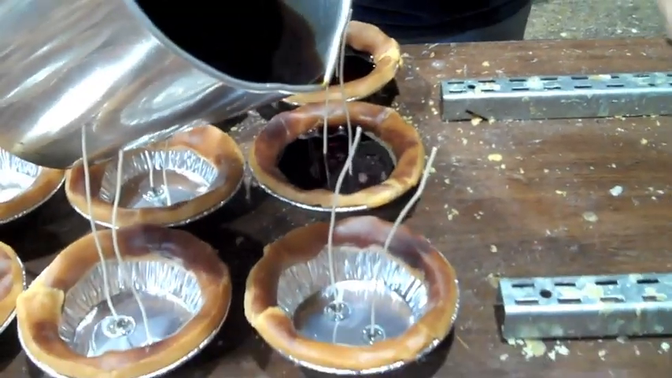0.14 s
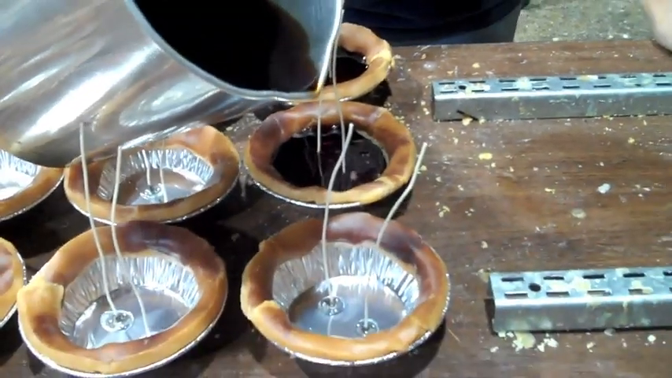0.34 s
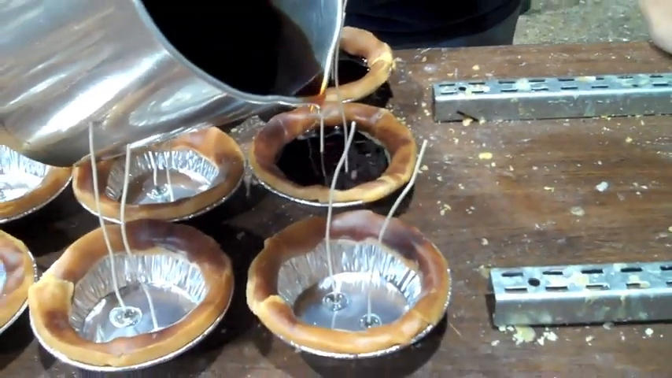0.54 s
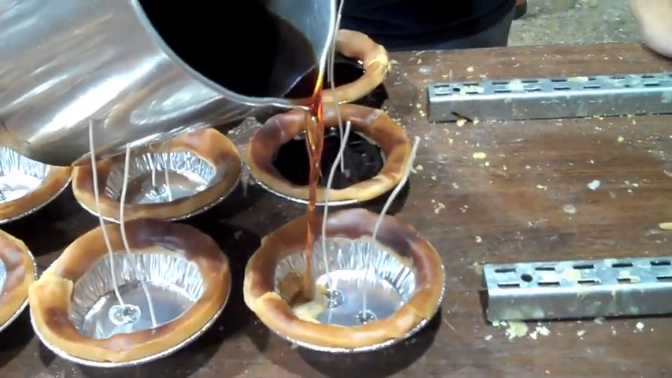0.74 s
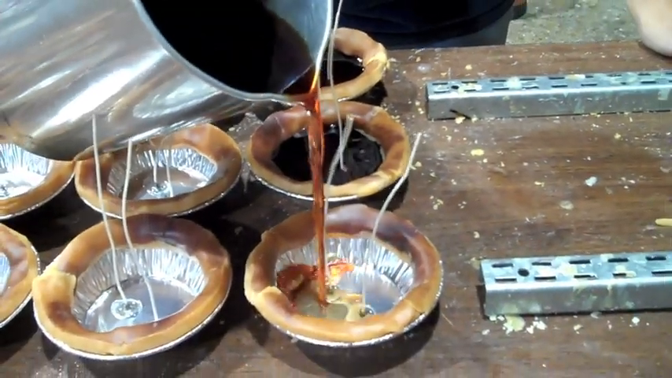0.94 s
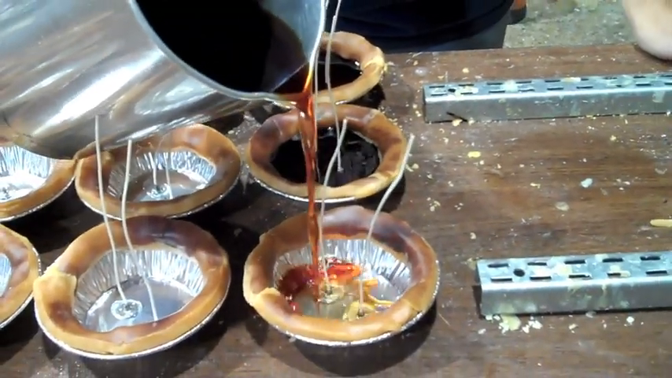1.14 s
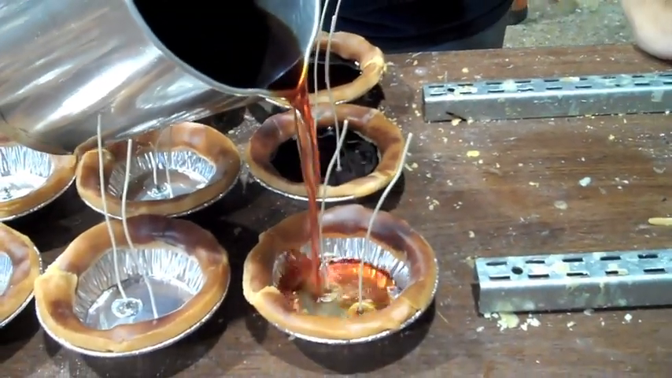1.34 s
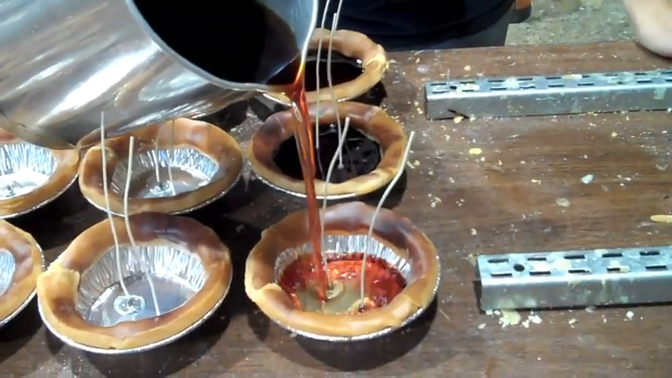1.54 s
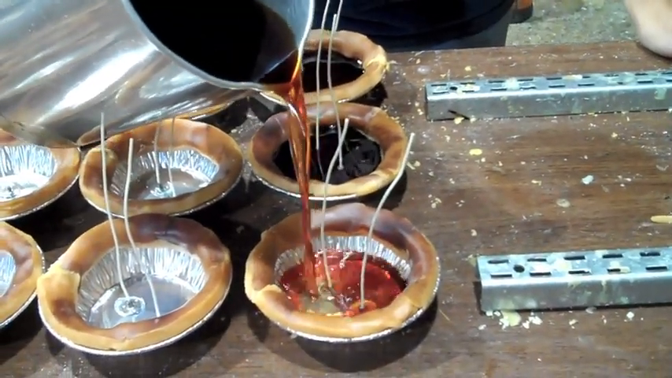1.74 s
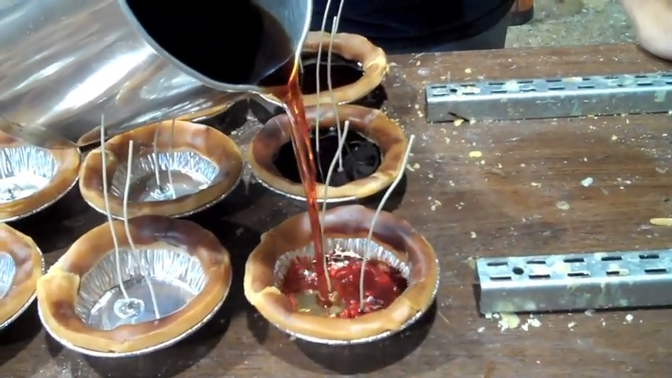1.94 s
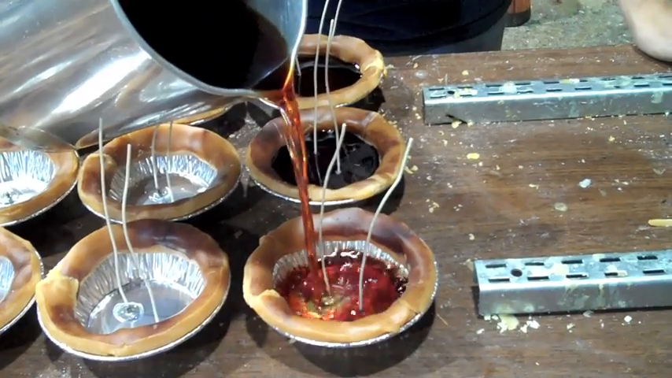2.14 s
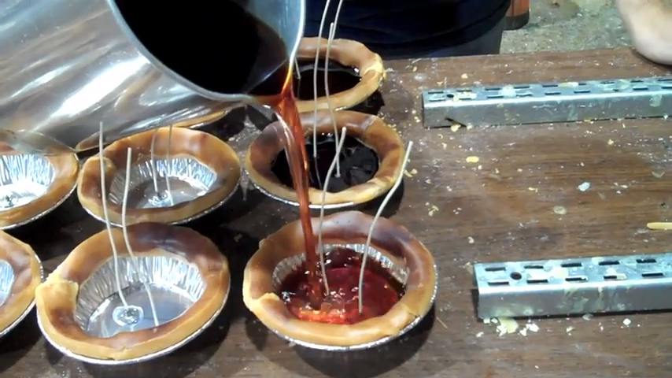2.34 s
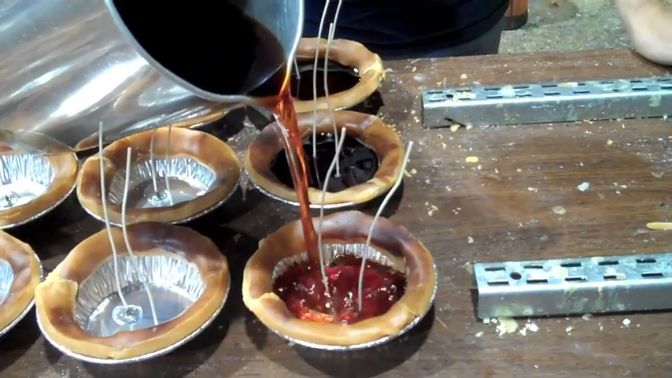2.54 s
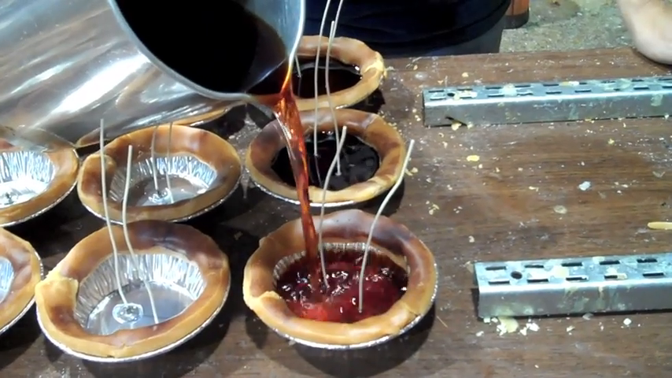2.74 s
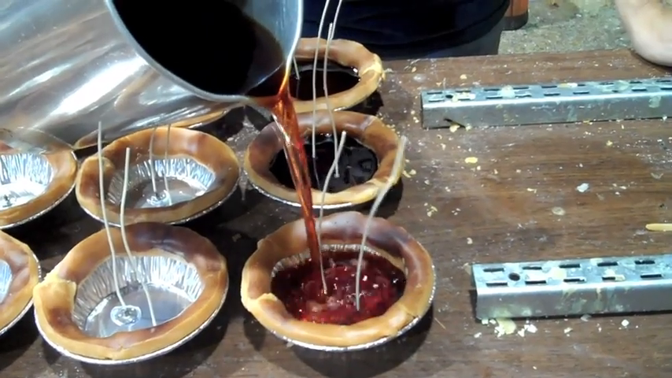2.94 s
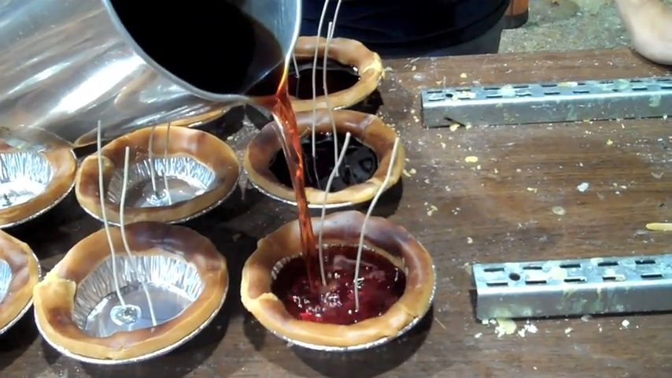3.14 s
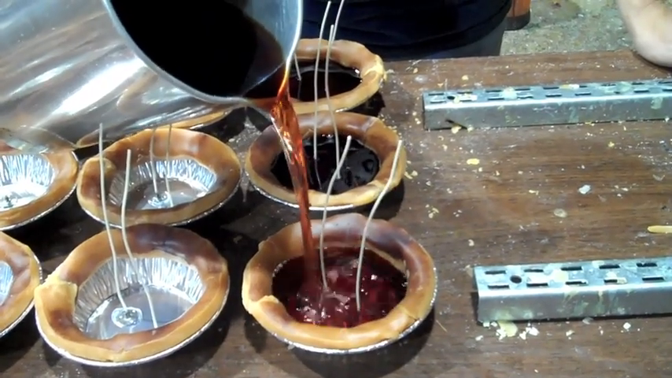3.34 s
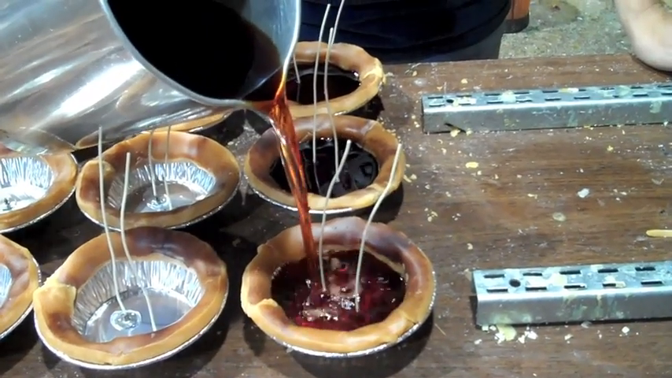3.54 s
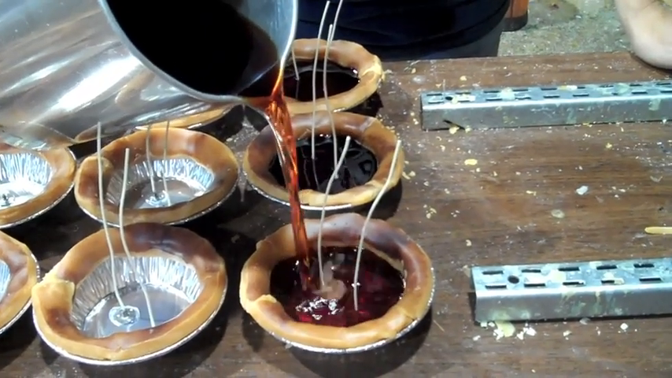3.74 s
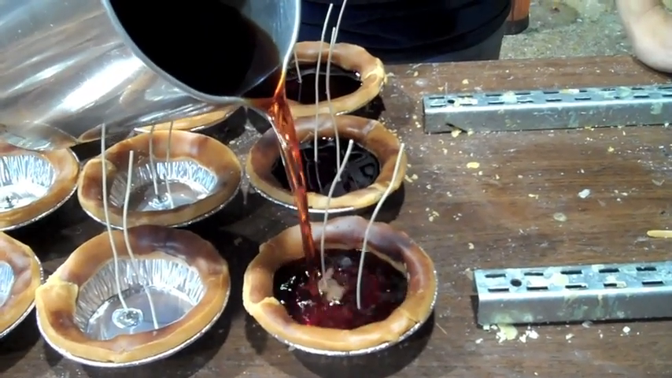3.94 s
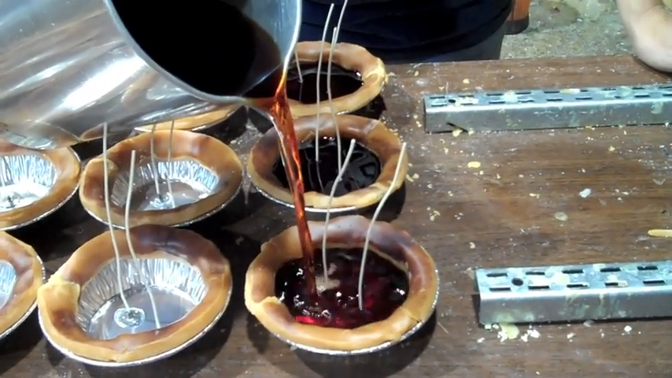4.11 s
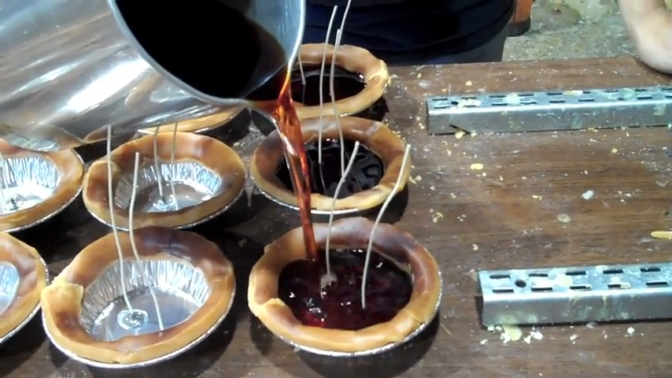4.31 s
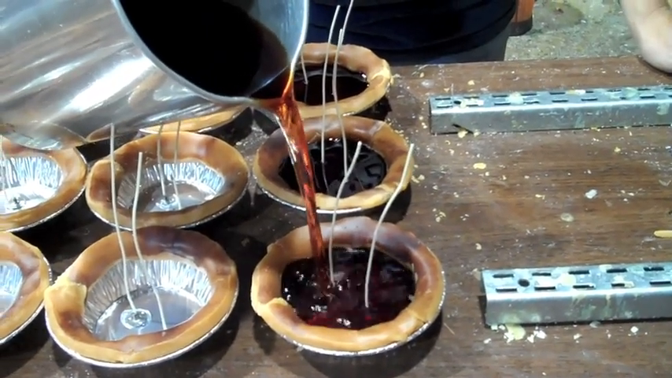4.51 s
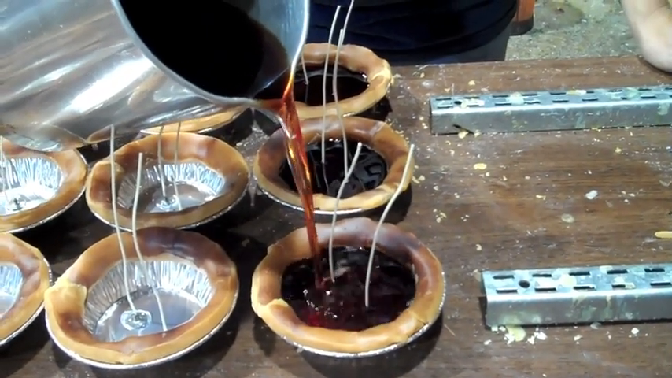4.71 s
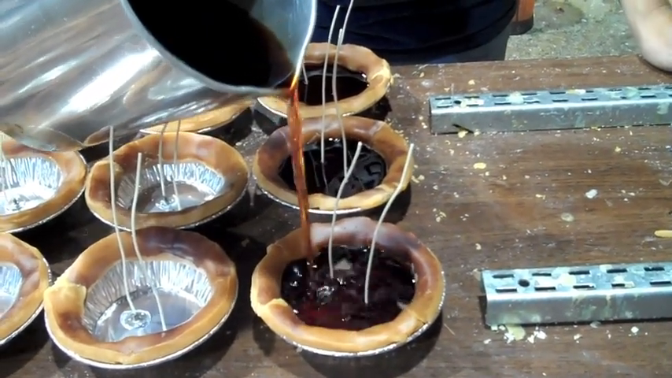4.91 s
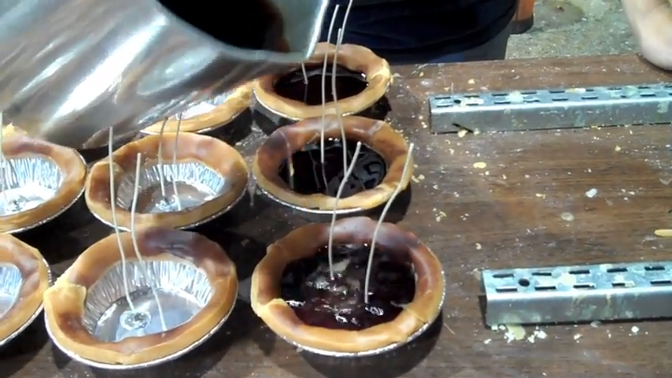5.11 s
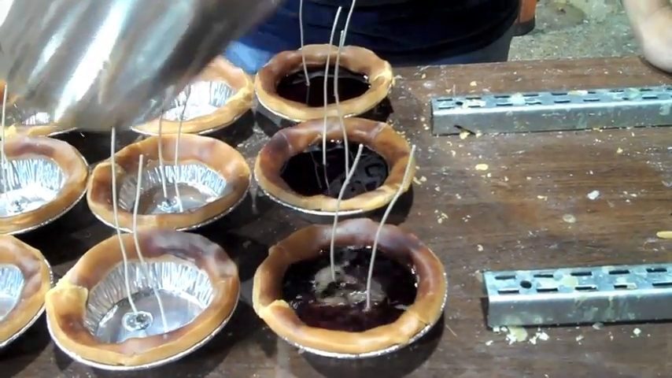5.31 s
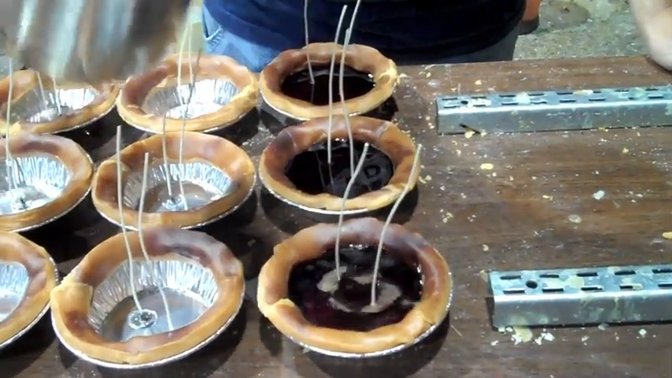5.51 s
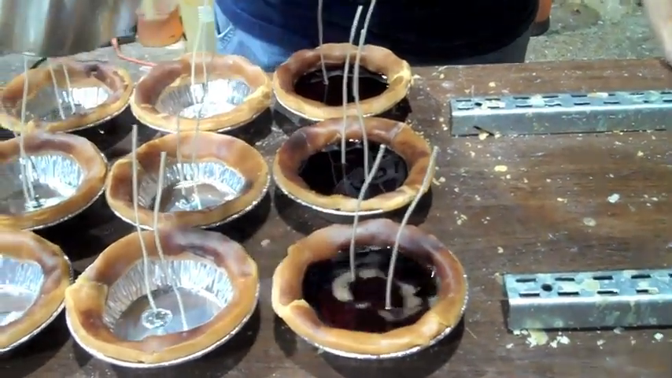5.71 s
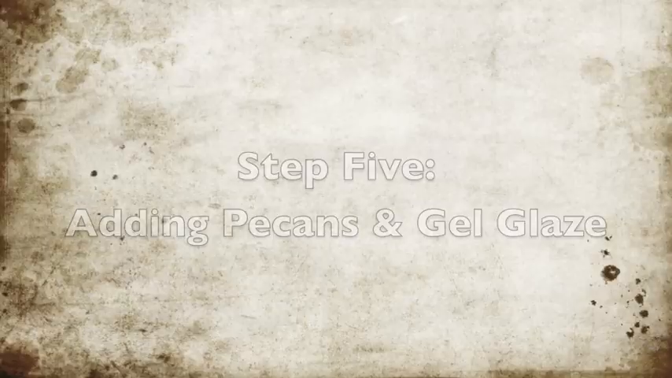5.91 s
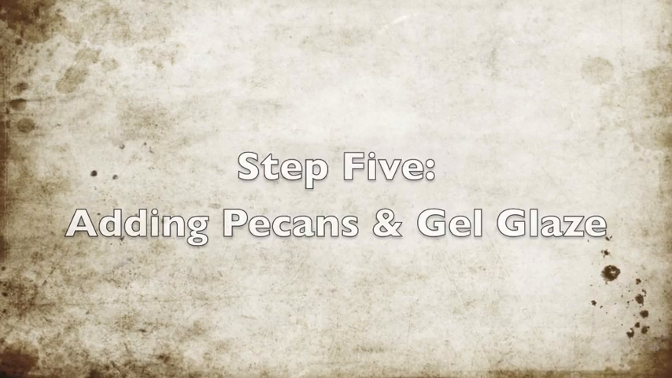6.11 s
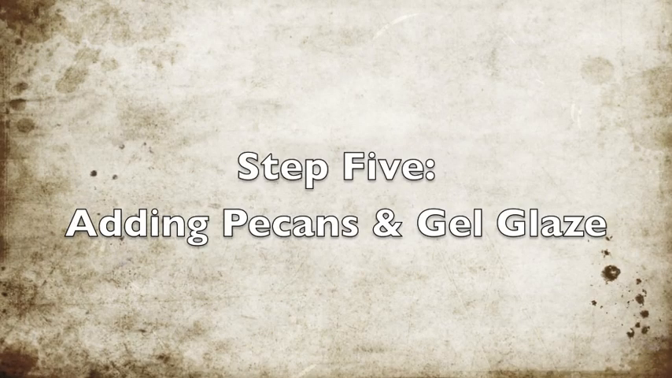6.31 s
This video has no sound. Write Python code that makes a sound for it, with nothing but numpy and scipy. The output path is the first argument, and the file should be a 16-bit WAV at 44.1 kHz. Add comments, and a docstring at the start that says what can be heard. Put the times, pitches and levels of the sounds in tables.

```python
"""At a table, a camera's two microphones stand close to a small foil tin as liquid wax runs into it.
The first drops patter on bare foil; then the stream spatters as damped sines and a wash of noise.
Bubbles caught in the rising pool snap and ring as rising tones; tin and surroundings echo the pour.
A fan-like machine nearby hums in wandering sines and shaped noise, with a high hiss and a thin whine.
An insect rasps in narrow noise every two seconds, and all of it fades out quickly."""
import sys
import numpy as np
from scipy import signal
from scipy.fft import rfft, irfft, next_fast_len
from scipy.io import wavfile
from scipy.ndimage import map_coordinates

SR = 44100
rng = np.random.default_rng(int(sys.argv[2]) if len(sys.argv) > 2 else 0)


def unload_audio(sound):
    """Save the sound as a 16-bit wav file, at the path given as the first command line argument."""
    columns = np.transpose(np.atleast_2d(sound))
    # keep every value between -1 and 1, then stretch to whole-number steps
    steps = np.round(np.clip(columns, -1, 1) * 32767)
    wavfile.write(sys.argv[1], SR, steps.astype(np.int16))


N = 280343

# strength of the main stream, which thins to almost nothing and picks up again,
# loud on bare foil and softer as the pool deepens: (time [s], level [dB])
STREAM_FLOW = [(1.239, -65.5), (1.35, -49), (1.46, -41), (1.75, -43), (1.92, -48.5), (2.0, -60.5),
               (2.21, -65), (2.28, -45.5), (2.36, -49), (2.5, -43.5), (2.78, -45), (2.89, -56.5),
               (2.97, -46), (3.14, -53.5), (3.7, -52), (3.84, -55.5), (5.1, -56.5), (5.301, -58)]
# lean of the liquid between the microphones: (frequency [Hz], left-right difference [dB])
LIQUID_LEAN = [(2400, 0), (4400, -1.5), (6000, -4), (7600, 17.5), (12000, 13.5)]

TOP_HZ = 14500  # upper band limit of the camera
SILENT_DB = -120


def amp(db):
    """Amplitude factor of a level in dB."""
    return 10 ** (np.asarray(db) / 20)


def unit(x):
    """Scale x to rms 1."""
    return x / np.sqrt(np.mean(x ** 2) + 1e-20)


def along(points, hz):
    """Read (frequency [Hz], value) points on a log frequency axis."""
    f, v = np.transpose(points)
    return np.interp(np.log(hz + 1), np.log(f + 1), v)


def clock():
    """Time of every sample in seconds."""
    return np.arange(N) / SR


def lean(db):
    """Left and right gains of mean power 1 for a left-right difference in dB."""
    g = amp(np.array([db, -db]) / 2)
    return g / np.sqrt(np.mean(g ** 2, axis=0))


def wobble(rate):
    """A smooth random curve with rate knots a second."""
    knots = rng.standard_normal(int(N * rate / SR) + 4)
    return map_coordinates(knots, [clock() * rate])


def filtered(x, response):
    """Multiply the spectrum of x by a response of frequency."""
    n = x.shape[-1]
    m = next_fast_len(n + 2048)  # zeros at the end keep the filter from wrapping round
    spectrum = rfft(x, m) * response(np.fft.rfftfreq(m, 1 / SR))
    return irfft(spectrum, m)[..., :n]


def add(track, s, sound):
    """Mix a short stereo sound in at time s."""
    part = track[:, max(round(s * SR), 0):][:, :sound.shape[1]]
    part += sound[:, :part.shape[1]]


def at_level(sound, db):
    """Give a short stereo sound the energy of 10 ms at this level."""
    return sound * amp(db) * np.sqrt(2 * SR / 100 / (np.sum(sound ** 2) + 1e-20))


def rush(spectrum):
    """Stereo noise of rms 1: mid and side shares make it alike in the bass, unrelated in the treble."""
    # likeness of the two channels: (frequency [Hz], coherence [0-1])
    likeness = [(60, 0.73), (130, 0.98), (290, 0.92), (640, 0.89), (1410, .7), (3100, 0.25), (6800, 0.027)]

    def mid_side_gains(hz):
        turn = np.arccos(np.clip(along(likeness, hz), -1, 1)) / 2
        return amp(along(spectrum, hz)) * [np.cos(turn), np.sin(turn)]

    mid, side = filtered(rng.standard_normal((2, N)), mid_side_gains)
    return unit(np.array([mid + side, mid - side]))


def tones(lines, drift_hz, waver_db):
    """Sines that wander in level, and in phase by one radian per drift_hz of their pitch."""
    total = 0
    for hz, db in lines:
        level = np.sqrt(2) * amp(db + waver_db * wobble(3.8))
        phase = 2 * np.pi * hz * clock() + hz / drift_hz * wobble(6)
        total = total + level * np.sin(phase)
    return total


def background(throb_hz=28.4, beat_s=2.66):
    """The nearby machine's hum, slow beat and rush of air, with a high hiss and a thin whine."""
    # moving air of the machine: (frequency [Hz], relative density [dB per Hz])
    air_colour = [(20, -20.5), (42, -8.5), (60, -10), (85, -6.5), (110, 0), (150, 1.5), (215, -7.5),
                  (295, -12.5), (430, -8), (770, -12), (900, -15), (1600, -19), (3300, -22.5),
                  (9000, -42.5)]
    # steady hiss: (frequency [Hz], relative density [dB per Hz])
    hiss_colour = [(1000, -32.5), (3300, -4), (5000, -1.5), (6200, 3.5), (7100, 4), (8000, -2.5),
                   (9200, -12), (11500, -16.5), (14300, -19)]
    # lean of the hiss: (frequency [Hz], left-right difference [dB])
    hiss_sides = [(2400, 1), (4400, -1), (6200, -4), (8000, 13.5), (12000, 1)]
    # thin whine: (frequency [Hz], level [dB rms])
    whine_lines = [(6603, -68), (6962, -65)]
    # lines of the machine: (frequency [Hz], level [dB rms])
    hum_lines = [(58, -66.5), (97, -63), (120, -60.5), (147.5, -58), (193.5, -57.5), (222, -62.5),
                 (240.1, -54.5), (339.5, -61.5), (363.5, -63), (421, -66.5), (504, -64), (700, -65),
                 (758, -65), (838.6, -63.5), (973, -70)]

    air = amp(-46.0 + 0.65 * wobble(7.8)) * rush(air_colour)
    # two close rotation rates beat against each other
    beat = np.cos(np.pi * clock() / beat_s)
    throb = amp(-54.5) * beat * np.sin(2 * np.pi * throb_hz * clock())
    throb = throb * lean(-6.0)[:, None]
    hiss = amp(-51) * filtered(rush(hiss_colour), lambda hz: lean(along(hiss_sides, hz)))
    # the whine wanders separately in each channel, the hum alike in both
    whine = np.array([tones(whine_lines, drift_hz=7000, waver_db=.7) for side in range(2)])
    hum = tones(hum_lines, drift_hz=577, waver_db=1.0)
    return air + throb + hiss + hum + whine


def foil(x):
    """The colour and sideways lean of spray inside the tin, as a filter for each channel."""
    # colour of foil and microphone on the spray: (frequency [Hz], gain [dB])
    spray_colour = [(700, -17.5), (1250, -1.5), (2000, -1.5), (2800, 0), (3500, -2), (6000, 4), (7800, 8.5),
                    (9300, -1), (14000, -3.5)]
    return filtered(x, lambda hz: amp(along(spray_colour, hz)) * lean(along(LIQUID_LEAN, hz)))


def droplets(s, hz, gain, cycles, size, scatter_s=.000016):
    """Damped sines, each reaching the two microphones at slightly different times."""
    t = np.arange(SR // 130) / SR
    hz = np.clip(hz, 600, TOP_HZ)[:, None]
    lag = scatter_s * rng.standard_normal((len(s), 1))
    index = (np.round(s * SR).astype(int)[:, None] + np.arange(len(t))).ravel()
    pair = []
    for side in (-.5, .5):
        turns = hz * np.maximum(t + side * lag, 0)
        swell_and_decay = np.exp(-turns / cycles) * (1 - np.exp(-turns))
        ring = gain[:, None] * np.sin(2 * np.pi * turns) * swell_and_decay
        pair.append(np.bincount(index, ring.ravel(), size)[:size])
    return np.array(pair)


def splashes(rows, burst_s=.0036, spread=0.442, count=24):
    """Each splash is a knot of tiny droplets that swells and thins out within a few milliseconds."""
    # brighter splashes lie further to the left
    centred_hz, left_db_per_octave = 4040, 10
    out = np.zeros((2, N))
    for s, db, hz in rows:
        pan_db = left_db_per_octave * np.log2(max(hz / centred_hz, 1))
        # each knot of droplets swells in softly, peaks and thins out
        place = rng.beta(3, 4, count)
        gain = amp(rng.normal(0, 2.5, count) - 32 * np.abs(place - .38))
        pitch = hz * np.exp(spread * rng.permutation(np.linspace(-1.8, 1.4, count)))
        gain = gain * np.sqrt(pitch / hz)
        knot = foil(droplets(2 * burst_s * place, pitch, gain, cycles=3, size=SR // 40))
        # even out the channels, so that the pan alone sets the lean
        knot = knot / np.linalg.norm(knot, axis=1, keepdims=True)
        # every knot sounds half a dB above its row's level
        add(out, s - burst_s / 2, at_level(knot * lean(pan_db)[:, None], db + .5))
    return out


def gushes():
    """Strength in dB of wax slopping from the spout: each gush rises, holds and drains away."""
    # separate gushes: (start [s], length [s], level [dB])
    slops = [(0.695, 0.034, -43), (0.985, 0.045, -46.5), (2.09, 0.045, -41.5), (2.232, 0.028, -45),
             (3.307, 0.099, -42.5), (4.2, .01, -50.5), (4.275, .015, -56), (4.37, 0.016, -55.5),
             (4.453, .05, -45.5), (4.64, 0.062, -48), (4.784, 0.055, -45), (4.938, 0.084, -48)]
    rise_s, fall_s = 0.0061, 0.013
    t = clock()
    power = amp(SILENT_DB) ** 2
    for s, length, db in slops:
        outside = np.maximum(s - t, 0) / rise_s + np.maximum(t - s - length, 0) / fall_s
        power = power + (amp(db) * np.exp(-outside)) ** 2
    return 10 * np.log10(power)


def patter(level_db, rate, centre_hz, spread, cycles, uneven_db, full_db):
    """Random droplets, rate a second, that partly merge into a noise wash as the level nears full_db."""
    draw = rng.random((10000, 4))[:int(rate * N / SR)]
    # two uniform draws make one normal draw
    normal = np.sqrt(-2 * np.log(1 - draw[:, 1])) * np.cos(2 * np.pi * draw[:, 2])
    pitch = centre_hz * np.exp(spread * normal)
    gain = amp(uneven_db * np.minimum(-np.log(1 - draw[:, 3]), 3.3))
    drops = droplets(draw[:, 0] * N / SR, pitch, gain, cycles, size=N)

    def wash_band(hz):
        return np.exp(-(np.log((hz + 1) / centre_hz) / (2 * spread)) ** 2)

    wash = filtered(rush([(1000, 0)]), wash_band)
    # the wash takes half the power at most
    share = .5 * np.minimum(amp(level_db - full_db), 1)
    mix = np.sqrt(1 - share) * unit(foil(drops)) + np.sqrt(share) * unit(foil(wash))
    return amp(level_db) * mix


def trickle(stream_db, gush_db):
    """Stream and gushes stir larger bubbles in the pool and throw fine spatter at the foil."""
    # the gurgle lies under the spatter, gains on it in a strong flow and loses as the pool deepens
    under_db, growth, strong_flow_db, loss_db_per_s = -2, 1.3, -45, 1.66
    gurgle_db = strong_flow_db + under_db + growth * (stream_db - strong_flow_db)
    gurgle_db = gurgle_db - loss_db_per_s * clock()
    spatter_db = 10 * np.log10(amp(stream_db) ** 2 + amp(gush_db) ** 2)
    gurgle = patter(gurgle_db, rate=750, centre_hz=2322, spread=.27, cycles=3.5,
                    uneven_db=3.5, full_db=-39)
    # a gush drags more air under: larger bubbles, 4 dB under its own strength
    gulp = patter(gush_db - 4, rate=550, centre_hz=2110, spread=.2, cycles=4,
                  uneven_db=3, full_db=-41)
    spatter = patter(spatter_db, rate=850, centre_hz=5900, spread=.29, cycles=5.5,
                     uneven_db=4.2, full_db=-37)
    # the stream lands in quick uneven surges
    surge = unit(amp(2.3 * wobble(110)))
    return surge * (gurgle + gulp + spatter)


def bubbles(attack_s=.0005, rise=.05, snap_t60=0.0045):
    """A bubble is pinched off with a wet snap, rings and rises a little in pitch."""
    # loudest ringing bubbles: (time [s], level over 10 ms [dB], starting pitch [Hz])
    rings = [(0.934, -36.5, 2570), (0.9334, -37.5, 1617), (1.1997, -44, 2610), (1.4928, -32, 5750),
             (1.545, -35, 7000), (1.748, -34, 2855), (1.7828, -36.5, 7220), (1.887, -34.5, 4860),
             (2.0489, -28.5, 6900), (2.087, -44, 2260), (2.3384, -36, 5960), (3.574, -44.5, 8970),
             (3.9786, -38, 6150), (4.2302, -41.5, 5960), (4.475, -45, 2200), (4.773, -32.5, 6230),
             (4.796, -46, 2067), (4.865, -44, 2040), (5.0054, -40.5, 8450), (5.199, -39.5, 5720)]
    ring_cycles = 43  # cycles in which a bubble dies away by 60 dB
    out = np.zeros((2, N))
    t = np.arange(SR // 30) / SR
    for s, db, hz in rings:
        t60 = ring_cycles / hz
        pan_db = along(LIQUID_LEAN, hz)
        phase = 2 * np.pi * np.cumsum(hz * (1 + rise * t / t60)) / SR
        # the channels differ more in phase for higher bubbles
        offset = hz / TOP_HZ * rng.standard_normal((2, 1))
        ring = np.sin(phase + offset) * amp(-60 * t / t60)

        def snap_band(f):
            return 1 / (1 + np.abs(np.log((f + 1) / hz) / 0.25) ** 3)

        crack = unit(filtered(rng.standard_normal(len(t)), snap_band))
        snap = .65 * crack * amp(-60 * t / snap_t60)
        pop = (ring + snap) * (1 - np.exp(-t / attack_s)) ** 2
        add(out, s, at_level(pop * lean(pan_db)[:, None], db))
    return out


def insect(rise_s=0.011, fall_s=0.047, centre_hz=5720, width_hz=380):
    """A short rasp of narrow-band noise that returns every two seconds."""
    # rasps at their peak: (time [s], level [dB])
    rasp_peaks = [(1.228, -46.5), (3.216, -42.5), (5.215, -44.5)]
    t = clock()
    swell = 0
    for s, db in rasp_peaks:
        swell = swell + amp(db) * np.exp(-((t - s) / np.where(t < s, rise_s, fall_s)) ** 2)

    def rasp_band(hz):
        return 1 / (1 + ((hz - centre_hz) / width_hz) ** 2)

    rasp = filtered(rng.standard_normal((2, N)), rasp_band)
    return swell * unit(rasp)


def strays(stream_db, count=80):
    """Rows for lesser splashes at random moments, their level following the stream that throws them."""
    over_stream_db, scatter_db, typical_hz = 3, 1, 5400
    s = rng.uniform(STREAM_FLOW[0][0], STREAM_FLOW[-1][0], count)
    size, colour = rng.uniform(-1.7, 1.7, (2, count))
    db = np.interp(s, clock(), stream_db) + over_stream_db + scatter_db * size
    return list(zip(s, db, typical_hz * np.exp(.2 * colour)))


def echoes(x, near_db=-9, near_t60=.022, room_db=-14):
    """Tin, pitcher and table answer at once, the surroundings more faintly, as decaying noise."""
    # reverberation of the nearby surroundings: (frequency [Hz], time to fall 60 dB [s])
    room_t60 = [(500, 0.087), (3000, 0.31), (10000, .1)]
    hz, t, z = signal.stft(rng.standard_normal((2, SR // 4)), SR, nperseg=256)
    decay = amp(-60 * t / along(room_t60, hz)[:, None])
    tail = signal.istft(z * decay, SR, nperseg=256)[1]
    age = np.arange(tail.shape[1]) / SR
    near = rng.standard_normal(tail.shape) * amp(-60 * age / near_t60) * (age > .0007)
    near_part = amp(near_db) * near / np.linalg.norm(near[0])
    room_part = amp(room_db) * tail / np.linalg.norm(tail[0])
    return signal.fftconvolve(x, near_part + room_part, axes=1)[:, :N]


def scene():
    """The pour close by and its echoes, over the machine and the insect."""
    # loudest splashes on foil and pool: (time [s], level over 10 ms [dB], centre [Hz])
    loud_splashes = [(0.689, -38, 4530), (0.718, -38.5, 6300), (0.845, -44.5, 5900), (0.935, -37.5, 1100),
                     (0.983, -27.5, 6500), (1.027, -36, 4240), (1.324, -32, 6600), (1.352, -40, 6850),
                     (1.423, -32.5, 4080), (1.44, -40, 8500), (1.463, -30, 4760), (1.474, -34.5, 5240),
                     (1.562, -36.5, 4430), (1.629, -35.5, 5940), (1.667, -31.5, 4370), (1.743, -32.5, 3210),
                     (1.903, -39, 9000), (1.91, -33.5, 4300), (2.051, -39, 5300), (2.123, -43, 4530),
                     (2.137, -42, 6060), (2.397, -39, 6050), (2.47, -37.5, 6700), (3.315, -33.5, 5150),
                     (3.349, -34.5, 3980), (3.397, -35, 4693), (3.603, -42.5, 3750), (4.694, -46, 2560),
                     (4.94, -37, 6370), (4.954, -37.5, 5900)]
    surroundings = background() + insect()
    flow_s, flow_db = np.transpose(STREAM_FLOW)
    stream_db = np.interp(clock(), flow_s, flow_db, left=SILENT_DB, right=SILENT_DB)
    wax = trickle(stream_db, gushes())
    wax = wax + splashes(list(loud_splashes) + strays(stream_db))
    wax = wax + bubbles()
    return wax + echoes(wax) + surroundings


def record(dry):
    """The camera's band limit, then a quick fade to near silence."""
    # closing fade: (time [s], gain [factor])
    fade = [(5.737, 1), (5.825, 0.00063)]
    limited = filtered(dry, lambda hz: hz < TOP_HZ)
    return limited * np.interp(clock(), *np.transpose(fade))


dry = scene()
out = record(dry)
unload_audio(out)
```